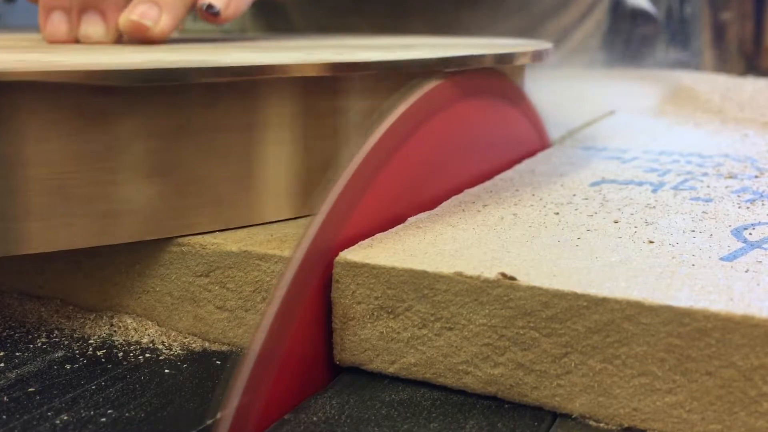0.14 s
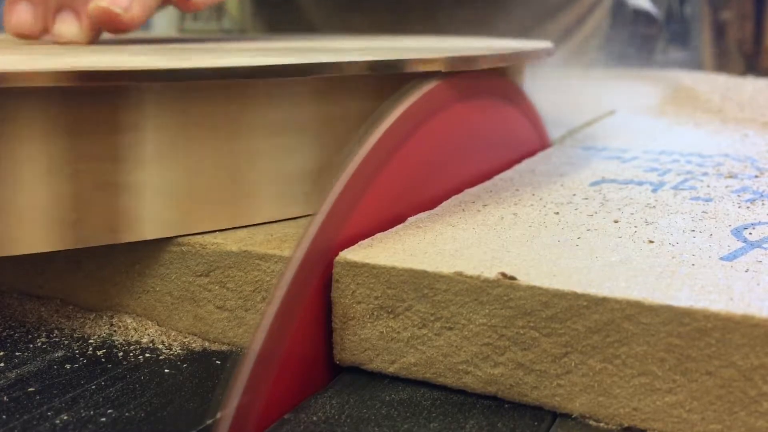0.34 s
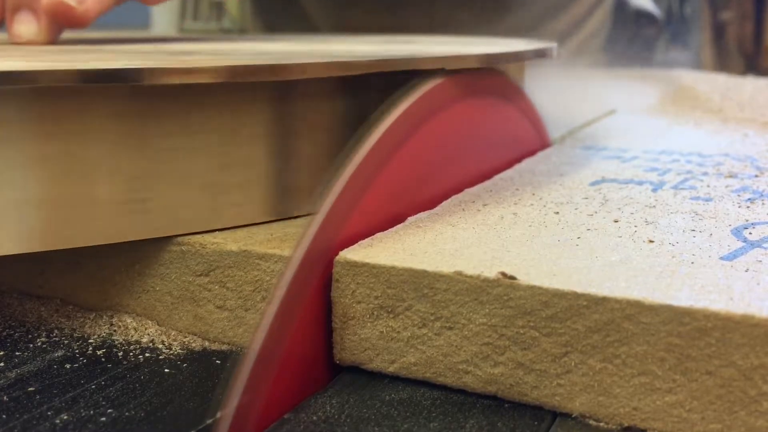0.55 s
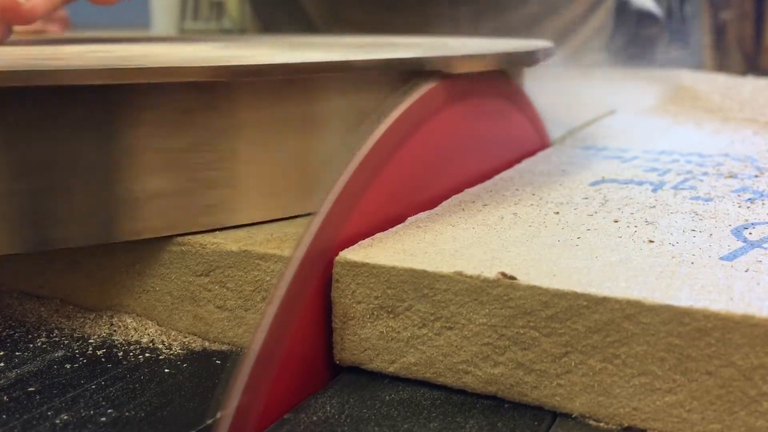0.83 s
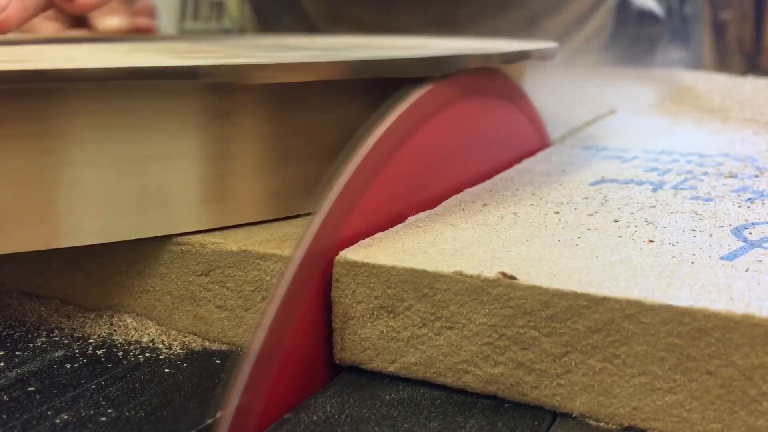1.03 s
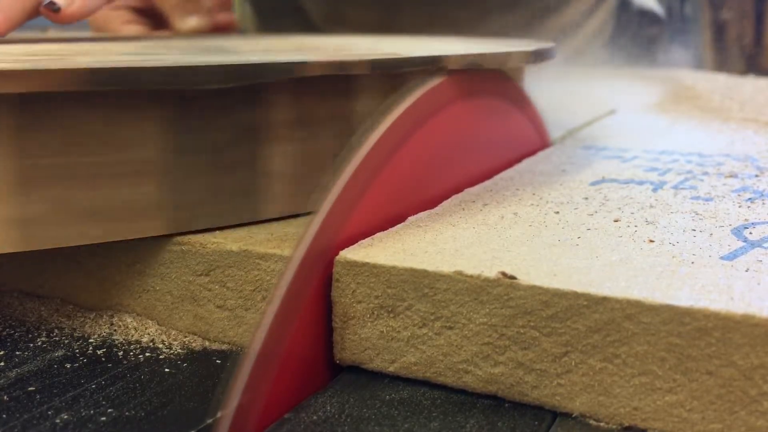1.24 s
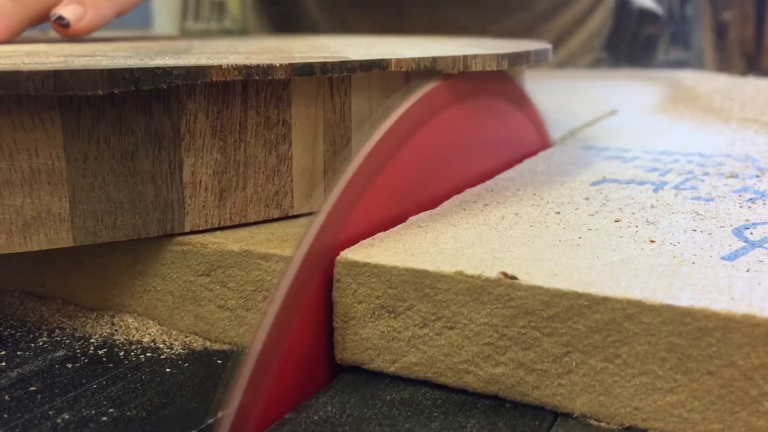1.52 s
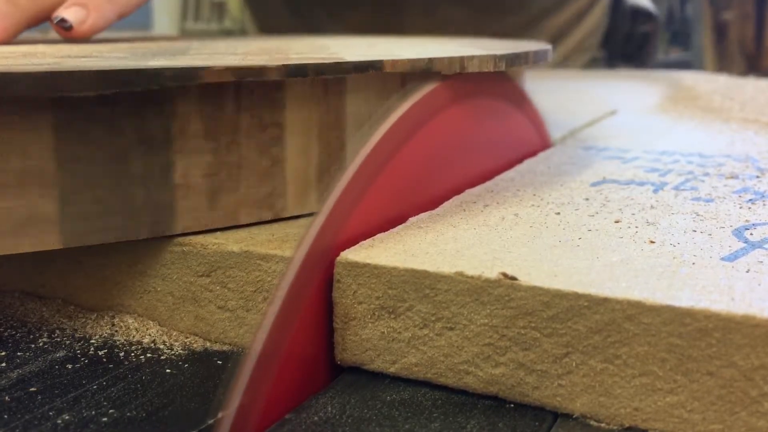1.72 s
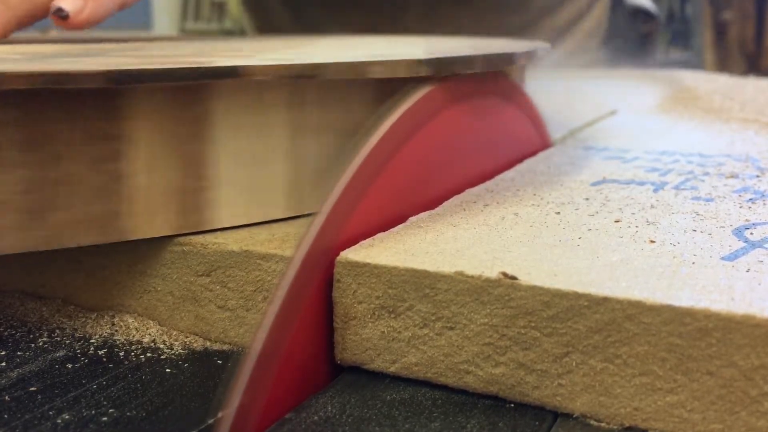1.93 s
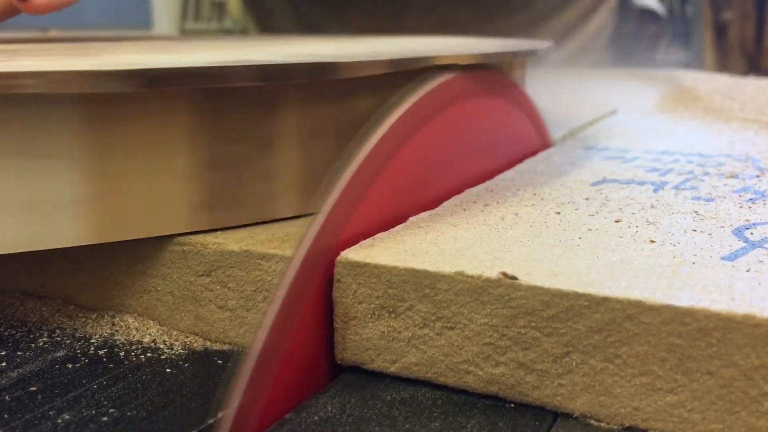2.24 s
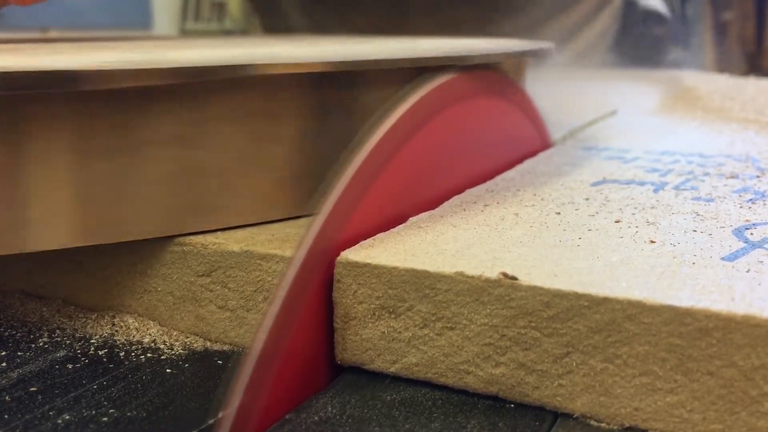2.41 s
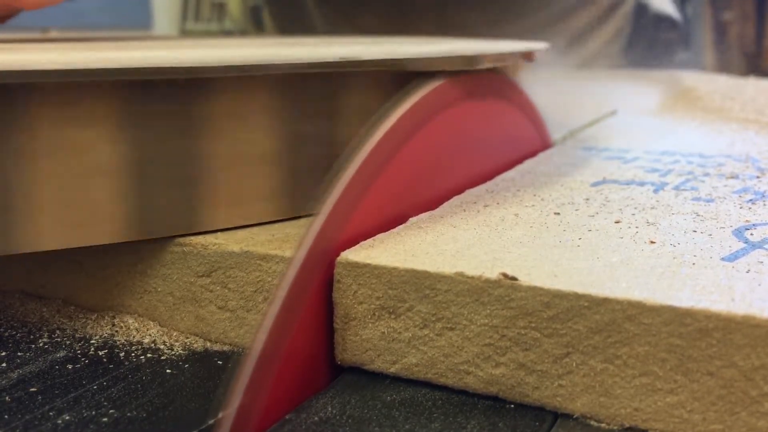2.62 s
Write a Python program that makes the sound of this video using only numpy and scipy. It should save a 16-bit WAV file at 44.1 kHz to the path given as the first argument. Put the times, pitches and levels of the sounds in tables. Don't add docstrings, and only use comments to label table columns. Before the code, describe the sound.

A table saw whines continuously from 0 to 2.8 seconds, close up, trimming a wooden disc. Dense buzzing tones and rough fibre hiss sit over motor and fan rumble. Squeals, some sliding downward, crowd the first 0.7 seconds; a sharp one comes near 1.2. Pitch rises very slightly around 1.6, then settles. More squeals come at 2.0, 2.2 and 2.7, with thin high ringing around 2.4-2.6.

```python
import sys
import numpy as np
from scipy import signal
from scipy.io import wavfile
from scipy.ndimage import uniform_filter1d

SR = 44100
rng = np.random.default_rng(int(sys.argv[2]) if len(sys.argv) > 2 else 0)


def generate_wav(sig):
    pcm = np.round(np.clip(np.atleast_2d(sig).T, -1, 1) * 32767).astype(np.int16)
    wavfile.write(sys.argv[1], SR, pcm)


def how_loud(loudness_db):
    steps = np.asarray(loudness_db, float) / 20
    return 10 ** steps


N = 122157
STEP = 64

# t/s, rate/(turns per s)
SHAFT_SPEED = [
    (0, 68.49),
    (1.3, 68.49),
    (1.6, 68.66),
    (1.9, 68.62),
    (2.05, 68.52),
    (2.77, 68.52),
]
MEAN_SHAFT_HZ = np.mean(SHAFT_SPEED, axis=0)[1]


def shaft_turns():
    return np.cumsum(in_time(*np.transpose(SHAFT_SPEED))) / SR


# t/s, bite depth as chip hiss level/dB, grain hardness as extra brightness level/dB
BITE_AND_GRAIN = [(0.0, -22.5, -9), (0.02, -24.5, -10), (0.76, -29, -9), (0.82, -26, -10),
                  (0.86, -26, -9.5), (1.13, -27.5, -4.5), (1.16, -25.5, -7.5), (1.3, -30.5, -10),
                  (1.74, -33.5, -5.5), (1.89, -28, -11), (1.9, -26.5, -3), (2.09, -36.5, -2),
                  (2.1, -30.5, -7), (2.31, -29, 0.5), (2.62, -26.5, -7), (2.63, -32.5, -4),
                  (2.75, -26, -6.5), (2.77, -26, -4)]


def cutting_force():
    s, *cut = np.transpose(BITE_AND_GRAIN)
    control_s = np.arange(N // STEP + 2) * STEP / SR
    cut = [np.interp(control_s, s, column) for column in cut]
    return [column - column.mean() for column in cut]


# f/Hz, share/1
BITE_SHARE = [(1000, 0.48), (3000, 0.13), (6000, 0.98), (11000, 0.99)]
# f/Hz, share/1
HARDNESS_SHARE = [(8500, 0), (11000, 0.88)]


def cut_db(hz, cut):
    bite, hardness = cut
    return np.outer(at_hz(BITE_SHARE, hz), bite) + np.outer(at_hz(HARDNESS_SHARE, hz), hardness)


TEETH_PER_SET = 30
SHAFT_ORDERS = [k for k in range(9, 214) if k < 134 or abs(k - 30 * round(k / 30)) < 2]
# f/Hz, level/dB
PLATE_MODES = [(8267, -41), (9085, -44), (12365, -46), (14440, -44), (2195, -40), (6300, -41), (6500, -42)]
# f/Hz, level/dB per line
UNEVEN_TOOTH_LINES = [(600, -44.5), (1500, -52.5), (2100, -35.5), (2900, -54), (3700, -41), (5500, -63.5),
                      (6400, -47), (10000, -56.5)]
# line level/dB, adjacent line level/dB
TOOTH_PAIR_LINES = [
    (-30.5, -36.5),
    (-32.5, -43.5),
    (-32, -36.5),
    (-43, -60),
    (-50, -60),
    (-47.5, -50.5),
    (-42, -57),
]
# shaft multiple/1, level/dB
BLADE_SLOT_LINES = [(18, -35), (27, -34), (74, -35), (73, -38), (132, -41), (78, -42), (93, -40)]


def line_spectrum(order, hz, cut):
    db = at_hz(UNEVEN_TOOTH_LINES, hz) + 2 * rng.standard_normal(len(order))
    start = rng.random(len(order))
    for k, (line_db, side_db) in enumerate(TOOTH_PAIR_LINES):
        away = abs(order - TEETH_PER_SET * (k + 1))
        db[away == 1] = side_db
        db[away == 0] = line_db
        if k == 0:
            start[away <= 1] = 0
    start[(order > TEETH_PER_SET) & (hz < 2800)] *= .3
    for multiple, line_db in BLADE_SLOT_LINES:
        db[order == multiple] = line_db
    db[-len(PLATE_MODES):] = np.array(PLATE_MODES)[:, 1]
    weak = (db < -36)[:, None]
    wander_db = 4 * drift(5, count=len(order)) * weak
    return db[:, None] + cut_db(hz, cut) + wander_db, start


# centre t/s, length t/s, f/Hz, glide/(Hz per s), boost level/dB
PANEL_SWELLS = [(.05, 0.18, 3640, -3500, 15.5), (0.133, 0.12, 4111, -82, 11.5),
                (0.213, 0.093, 3880, -2600, 20), (.28, 0.086, 4110, -100, 10.5),
                (.34, .14, 3200, -4000, 11), (.47, .18, 2620, -3600, 11), (.42, .16, 3400, -1500, 5),
                (0.43, 0.17, 2055, -100, 9.5), (0.656, 0.14, 4066, -88, 18),
                (0.643, 0.036, 3960, -800, 12.5), (0.679, 0.052, 3720, -1500, 19),
                (1.01, 0.21, 2060, -100, 11.5), (1.004, 0.031, 4110, -100, 11),
                (1.18, 0.074, 4700, -3100, 13), (1.235, 0.08, 4120, -100, 26), (1.27, .06, 4110, -100, 15),
                (1.38, .12, 2900, -300, 8), (1.64, .5, 2640, -210, 12), (1.95, .15, 4115, -100, 10),
                (2.0, 0.17, 2103, -100, 20), (2.006, 0.37, 3160, -1900, 17), (2.213, 0.079, 4120, -100, 24),
                (2.745, 0.044, 4110, -100, 22), (2.68, .05, 4620, -1900, 22)]
# centre t/s, length t/s, f/Hz,
# glide/(Hz per s), boost level/dB
MORE_SWELLS = [(2.66, .12, 4110, -100, 5), (2.75, .06, 3980, -800, 10), (1.87, .08, 3640, -300, 7),
               (2.19, .1, 6170, -100, 6), (2.45, .14, 6170, -100, 9), (2.6, .07, 6170, -100, 10),
               (2.47, .13, 8250, -100, 10), (2.59, .1, 8250, -100, 16), (2.38, .27, 10280, -100, 12),
               (.46, .1, 12340, -100, 6), (.95, .25, 12340, -100, 5), (1.96, .08, 12340, -100, 6),
               (2.4, .4, 12340, -100, 4), (.53, .09, 14420, -100, 10), (1.03, .25, 14420, -100, 7),
               (1.92, .05, 14420, -100, 12), (2.06, .09, 14420, -100, 9), (1.19, .06, 9050, -100, 6),
               (2.41, .05, 9050, -100, 7)]


def resonant_lift(hz, s):
    lift = np.ones((len(hz), len(s)))
    for middle, length, centre_hz, glide, boost_db in PANEL_SWELLS + MORE_SWELLS:
        sharpness, power = (32, 2) if glide > -200 else (21, 4)
        since = s - middle
        off = (hz[:, None] - centre_hz - glide * since) * 2 * sharpness / centre_hz
        envelope = np.exp(-(2 * since / length) ** power)
        lift += (how_loud(boost_db) - 1) * envelope / (1 + off ** 2)
    return lift


def line_roughness(hz):
    rough = np.clip(.22 * (hz / 4000) ** 2.36, 0, .95)[:, None]
    chance = complex_drift(45, count=len(hz))
    return np.sqrt(1 - rough ** 2) + rough * chance / np.sqrt(2)


def teeth(turns, cut):
    order = np.array(SHAFT_ORDERS + [hz / MEAN_SHAFT_HZ for hz, db in PLATE_MODES])
    hz = order * MEAN_SHAFT_HZ
    s = np.arange(len(cut[0])) * STEP / SR
    db, start = line_spectrum(order, hz, cut)
    size = how_loud(db + 4) * resonant_lift(hz, s) * line_roughness(hz)
    return sum(tone(2 * np.pi * (k * turns + p), a) for k, p, a in zip(order, start, size))


# f/Hz, level/dB per Hz
CHIP_SPECTRUM = [(1000, -14), (1600, -8), (2200, -0.5), (3500, -0.5), (5600, -8), (6400, -8.5), (9000, -11),
                 (15500, -16)]


def chips(turns, cut):
    throb = 1 + 0.19 * np.cos(2 * np.pi * turns)
    follow = 0.51 * np.array(cut)
    hiss = highpass(banded_noise(CHIP_SPECTRUM, patchy_db=1.5, flicker=14.0, cut=follow), 2, 900)
    return how_loud(-19) * throb * hiss


# f/Hz, level/dB
MOTOR_TONES = [(120, -30), (506, -36), (732, -42), (759, -41), (980, -36), (1028, -41), (1050, -41),
               (250, -39)]
# f/Hz, level/dB per Hz
RUMBLE_SPECTRUM = [(35, -13), (60, -2.5), (119, -1.5), (416, -8), (507, -10), (694, -13), (1000, -11),
                   (1800, -17.5), (2340, -33), (3960, -120)]


def machine():
    tones = 0
    for (hz, db), chance in zip(MOTOR_TONES, complex_drift(7.9, count=len(MOTOR_TONES))):
        size = how_loud(db + 3.5) * (1 + 0.46 * chance / 2)
        tones = tones + tone(2 * np.pi * hz * np.arange(N) / SR, size)
    noise = banded_noise(RUMBLE_SPECTRUM, patchy_db=0.8, flicker=12.0, cut=(0, 0))
    return tones + how_loud(-23.5) * highpass(noise, 4, 44.6)


def in_time(s, values):
    return np.interp(np.arange(N) / SR, s, values)


def at_hz(points, hz):
    points = np.array(points)
    return np.interp(np.log(hz), np.log(points[:, 0]), points[:, 1])


def highpass(x, order, hz):
    return signal.sosfilt(signal.butter(order, hz, "high", fs=SR, output="sos"), x)


def drift(rate, count):
    r = np.exp(-2 * np.pi * rate * STEP / SR)
    white = rng.standard_normal((count, N // STEP + 602))
    slow = signal.lfilter([1], [1, -2 * r, r * r], white)[:, 600:]
    return slow / slow.std()


def complex_drift(rate, count):
    return drift(rate, count) + 1j * drift(rate, count)


def tone(phase, size):
    angle = (phase % (2 * np.pi)).astype(np.float32)
    size = in_time(np.arange(len(size)) * STEP / SR, size)
    return size.real * np.cos(angle) - size.imag * np.sin(angle)


def banded_noise(spectrum, patchy_db, flicker, cut):
    edges = 23 * 2 ** np.arange(0, 9.7, 1 / 3)
    white = rng.standard_normal((2, N))
    own = drift(flicker, count=len(edges))
    shared = drift(flicker, count=1)[0]
    s = np.arange(len(shared)) * STEP / SR
    out = 0
    for k, (low, high) in enumerate(zip(edges, edges[1:])):
        centre_hz = np.sqrt(low * high)
        band_filter = signal.butter(2, [low, high], "band", fs=SR, output="sos")
        band = signal.sosfilt(band_filter, white[k % 2])
        flicker_db = patchy_db * (own[k] + 0.44 * shared)
        level_db = at_hz(spectrum, centre_hz) + flicker_db + cut_db(centre_hz, cut)[0]
        out = out + band * in_time(s, how_loud(level_db))
    return out / out.std()


def scene():
    turns = shaft_turns()
    cut = cutting_force()
    return (teeth(turns, cut) + chips(turns, cut) + machine())[None]


def low_pass(x):
    return signal.sosfilt(signal.butter(12, 16180, fs=SR, output="sos"), x)


def record(dry):
    level_db = 10 * np.log10(uniform_filter1d(dry[0] ** 2, size=882) + 1e-12)
    over_db = 0.56 * (level_db + 10.5)
    recovery_db = 6 * np.arange(N) / SR
    duck_db = np.maximum(np.maximum.accumulate(over_db + recovery_db) - recovery_db, 0)
    r = np.exp(-1 / (0.079 * SR))
    ducked = dry * how_loud(-signal.lfilter([1 - r], [1, -r], duck_db))
    saturated = 1.298 * np.tanh(ducked / 1.304)
    top_cut = signal.ellip(14, .3, 60, 15720, fs=SR, output="sos")
    mix = signal.sosfilt(top_cut, saturated)
    return low_pass(mix)


dry = scene()
out = record(dry)
generate_wav(out)
```